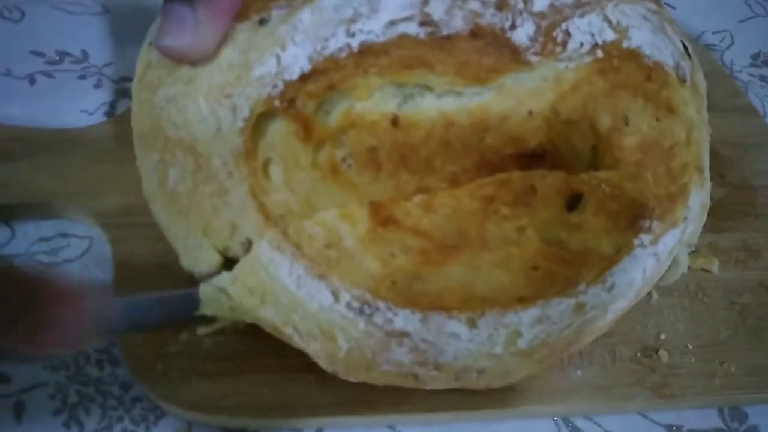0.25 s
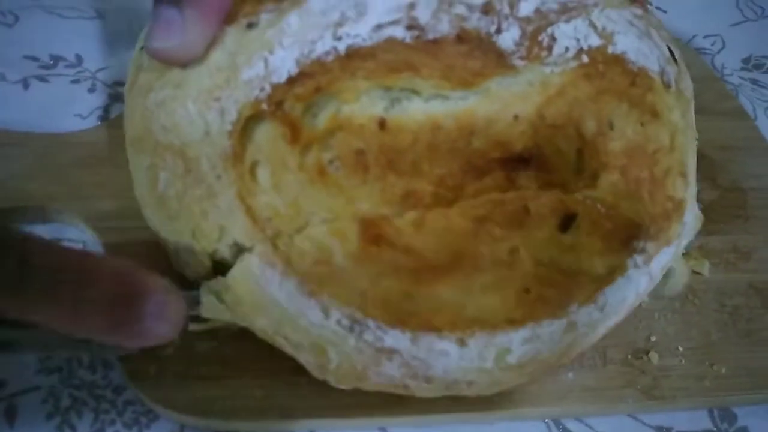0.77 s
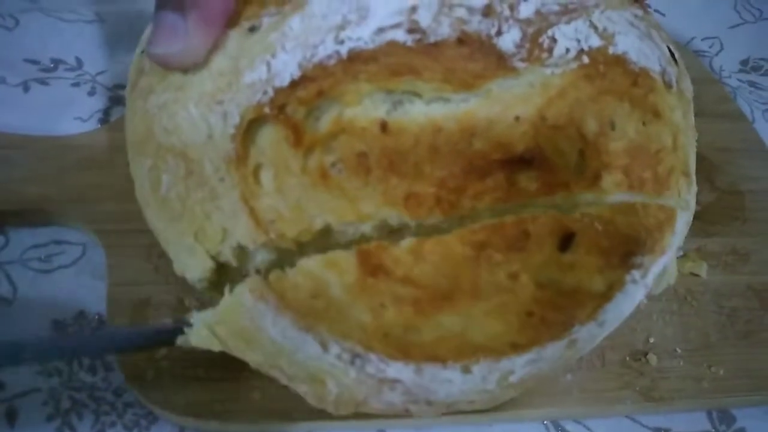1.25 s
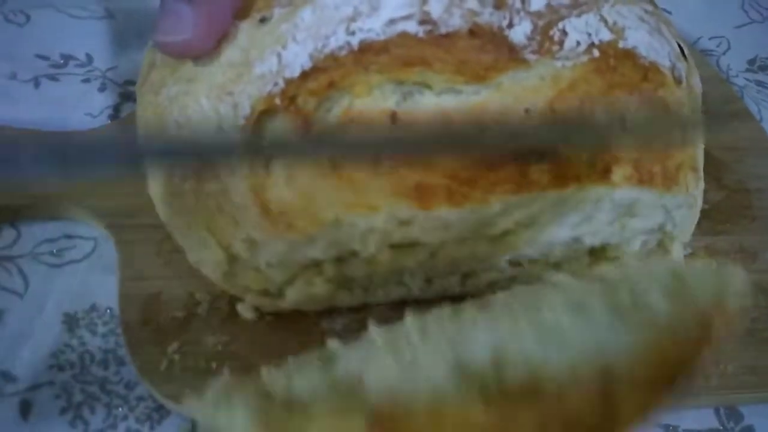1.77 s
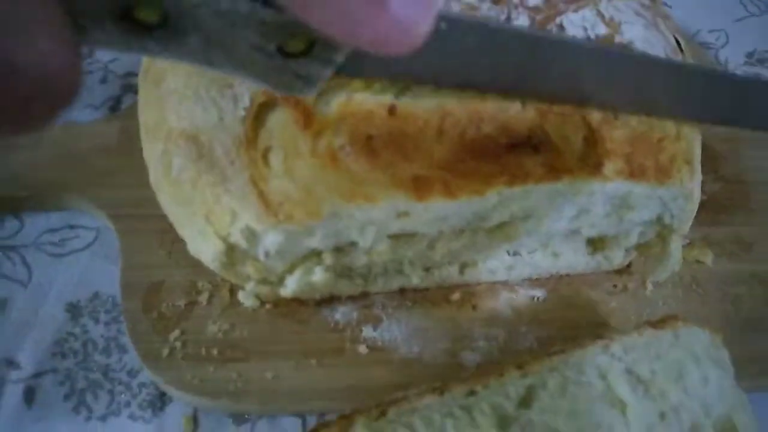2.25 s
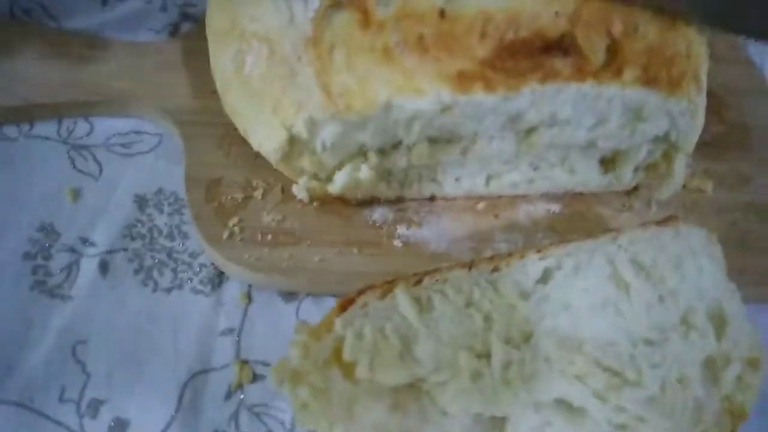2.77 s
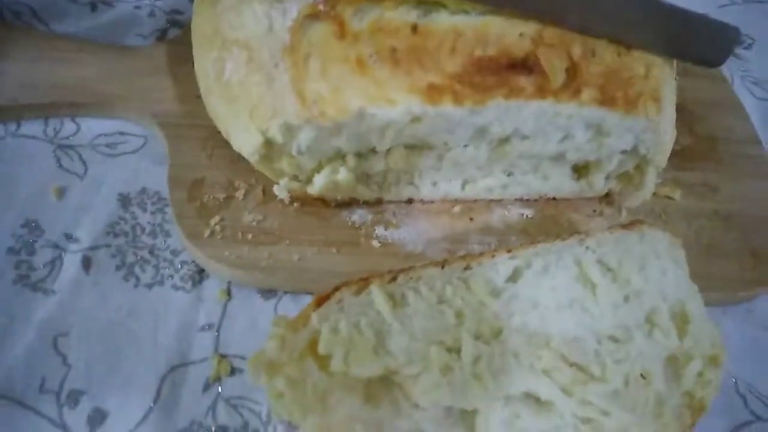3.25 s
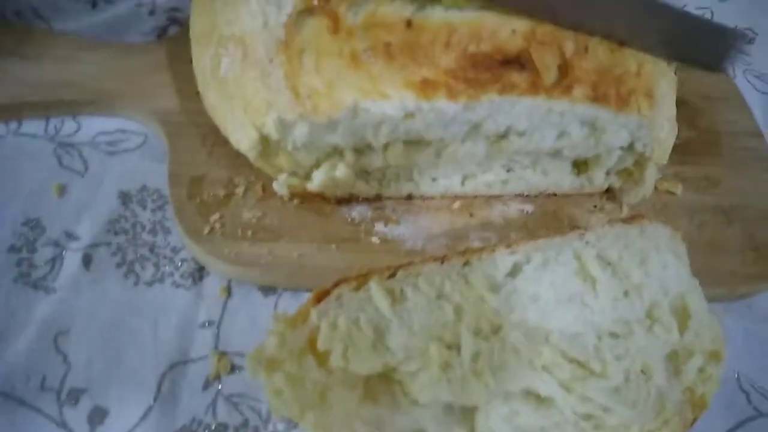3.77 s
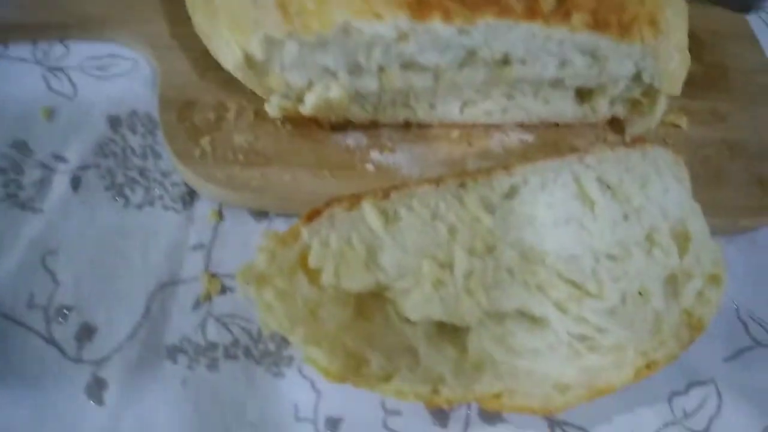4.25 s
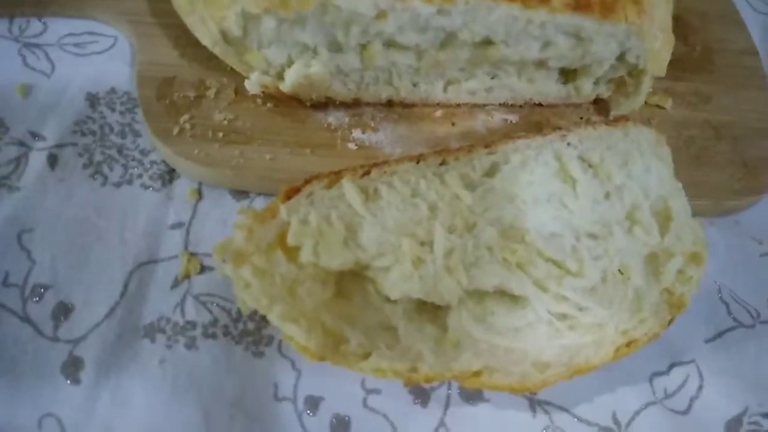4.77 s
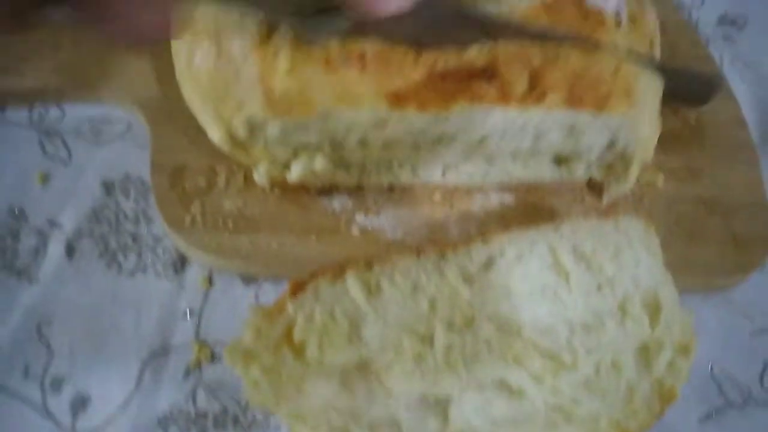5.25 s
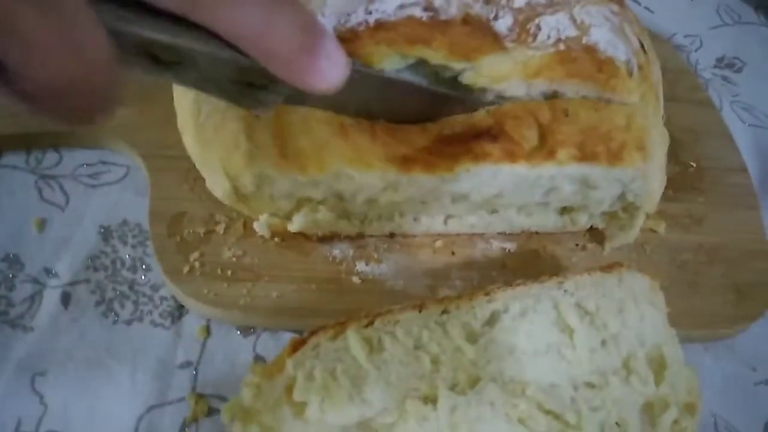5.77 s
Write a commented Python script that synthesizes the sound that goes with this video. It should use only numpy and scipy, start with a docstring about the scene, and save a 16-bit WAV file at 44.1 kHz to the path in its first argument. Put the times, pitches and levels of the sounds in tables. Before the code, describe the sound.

Very close to the microphone in a quiet room, a serrated knife saws a crusty loaf in rapid, rough strokes with loud cracks and a brief steely ring at the start. After a second the blade slides out softly, near silence follows, and the slice knocks on the board and rustles. Crackles lead into a second, longer run of even sawing with low wooden rumbling.

```python
"""A serrated knife saws through a crusty loaf on a wooden board that lies on a cloth-covered table.
Each stroke is a swell of noise: dense cracks for the crust, resonances for the loaf, board and table.
The steel blade sings at the start; after the first cut it slides out, and the slice knocks and slides.
Sawing then resumes. Noise reaches two ports alike in the bass; the hardest peaks clip."""
import sys
import numpy as np
from scipy import signal
from scipy.io import wavfile
from scipy.ndimage import uniform_filter1d

SR = 44100
rng = np.random.default_rng(int(sys.argv[2]) if len(sys.argv) > 2 else 0)


def store_pcm(level_fs):
    """Save levels as 16-bit WAV."""
    pcm = np.round(np.clip(level_fs, -1, 1) * 32767).astype(np.int16)
    wavfile.write(sys.argv[1], SR, np.atleast_2d(pcm).T)


N = 265041

# Loud single breaks of crust and crumb. Each row: start in seconds, relative peak in dB,
# relative crispness (treble weight) in dB, relative level of the thud in dB.
CRACKS = [(0.06, -8, -18, -25), (0.348, -15, -22, -23), (0.3798, 10, -3.5, -27), (0.4977, -4, 0.5, -3),
          (0.532, 8.5, -42, -5), (0.6367, -3, 4, -5), (0.6632, 14, -12, -7), (.785, -20, -29, -2),
          (0.8071, 0, -15, 0), (0.91, -6, 6.5, -24), (0.9552, 12.5, -9, -8), (0.9834, 11.5, 2.5, -11),
          (1.177, -1, -36, -37), (1.4561, -26.5, -22, -43.5), (1.5652, -17, -17, -13.5),
          (2.139, -26, -26, -15.5), (2.183, -30, -14, -32.5), (2.2456, -16, -13, -25),
          (2.284, -24, -20, -19), (2.2994, 3, -18, -36), (2.307, 1, 3, -5), (2.3189, 6.5, -8, -15),
          (2.3417, 7.5, -3, -22), (2.359, 4, -20, -35), (2.371, 10, -19, -32), (2.397, -1, -18.5, -11),
          (2.4242, -4, -5, -28), (2.728, -38, -5, -47), (2.978, 3, -1, -29), (2.984, 1, -1, -25),
          (3.0743, 4, -5, -14), (3.1762, -5, 0, -35), (4.7964, 3, -22, 2.5), (4.828, 4, -24, -22),
          (5.246, 0, -9, -28), (5.3024, -15, -3, -28), (5.114, -7, -23, -12), (.1, -2, -23.5, -24),
          (.24, -15, -23, -20), (.674, 1, -9, -13), (0.819, -6, -12, -16), (0.836, -2, -14, -20.5),
          (3.59, -14, -10, -22), (4.19, -11, -9, -20), (2.4093, -1, 0, -34), (2.4401, 0, -10, -8),
          (2.493, -12, -8, -23.5), (2.817, -12, 0, -18), (2.846, -9.5, 1, -36), (2.9047, -24, 3, -40),
          (2.9538, -4, -4, -32), (2.967, 2.5, 2, -18), (3.0069, 5.5, 2, -31), (3.0669, 7.5, -4, -12),
          (3.097, 2, 4, -10), (3.1218, -24, -13, -5.5), (3.1474, -9, -12, -7.5), (3.2208, -4.5, 4, -31),
          (3.2355, 4, -6, -11), (3.263, 7, -2, -26), (3.28, 7, -10, -24), (3.3006, 9, -18, -26),
          (3.385, -2, -0.5, -36), (3.4162, -17, -7, -29), (3.453, 4, -3, -4), (3.482, -4, 6, -23),
          (3.5523, -1, -11, -20), (3.6827, -2, -6, -14), (3.7556, -3, 7.5, -18), (3.7885, -.5, 9.5, -9),
          (3.833, 1, -6, -26), (3.8487, 5.5, -3, -28), (3.8756, 8.5, -8, -25), (3.9126, 4.5, 0, -26),
          (3.9569, -3, 5, -23), (4.085, -2, 0, -17), (4.147, 4.5, -39, -4), (4.167, 5, -42, -1),
          (4.3196, -10, -19, -10), (4.4264, -14, 3, -19), (4.4446, 4.5, -3, 2), (4.4754, 13.5, -6, 10),
          (4.5204, 0, 6, 5), (4.602, -5, -4, -16), (4.683, -2, -3, -32), (4.764, -2, -5, 0),
          (4.7798, -1, -4, 23.5), (4.811, 9, -33, 1), (4.845, 7, -33, 0), (5.0614, -4.5, 9, -25),
          (5.0807, 11.5, -40, -19), (5.0983, 10.5, -35, 1.5), (5.21, -2.5, -36, -30), (5.23, -10, 7, -31),
          (5.3492, 4, -19, -10), (5.4024, 7.5, -25, -25), (5.4226, 4.5, -36, -17), (5.443, 4, -51, -33),
          (5.533, -1, -28, -26), (5.5516, 10.5, -36, -18), (5.5976, 2.5, 1.5, -7), (5.693, 12.5, -9, -29),
          (5.74, 4.5, -18, -10), (5.8827, -1, -5, -17), (5.911, 2.5, 0.5, -31)]
# Spectrum of breaking crust. Each row: frequency in Hz, relative density in dB per Hz.
CRUST_SPECTRUM = [(500, -17), (750, -9), (1260, -9.5), (1900, -6.5), (2900, -9.5), (3500, -11.5),
                  (6700, -14), (7700, -13.5), (9000, -11), (10300, -26), (12500, -44.5), (14800, -27.5),
                  (16000, -45)]
EDGE_UNTIL_S = 1.0  # until then the blade reaches the board
CRACK_T60_S, BOTTOM_CRACK_T60_S = 0.009, 0.016  # the thick bottom crust tears for longer


def from_db(db):
    """Amplitude gain from a level: 20 dB is a factor of ten."""
    return 10 ** (np.asarray(db) / 20)


def rms_one(x):
    """Normalization to unit mean power."""
    return x / np.sqrt(np.mean(x ** 2) + 1e-20)


def in_time(rows):
    """Linear interpolation of each table column over time."""
    s, *columns = np.transpose(rows)
    time = np.arange(N) / SR
    return [np.interp(time, s, column) for column in columns]


def at_hz(points, hz):
    """Interpolation of a spectrum on a logarithmic frequency axis."""
    point_hz, values = np.transpose(points)
    return np.interp(np.log(hz), np.log(point_hz), values)


def low_pass(x, hz):
    """Third-order low-pass filtering: treble above hz falls away."""
    return signal.sosfilt(signal.butter(3, hz, fs=SR, output="sos"), x)


def drift(rate_hz):
    """Slow random modulation: noise through a double pole, spread 1, computed at every 40th sample."""
    step = 40
    r = np.exp(-2 * np.pi * rate_hz * step / SR)
    noise = rng.standard_normal(N // step + 2002)
    slow = rms_one(signal.lfilter([1], [1, -2 * r, r * r], noise)[2000:])  # settled part
    return np.interp(np.arange(N) / step, np.arange(len(slow)), slow)


def fade(clicks, t60):
    """Exponential decay: each click falls by 60 dB in t60 seconds."""
    return signal.lfilter([1], [1, -from_db(-60 / (t60 * SR))], clicks + 1e-18)


def two_ports(mid, side, hz):
    """Partial coherence of two ports: alike in the bass, nearly unrelated in the treble."""
    # Each row: frequency in Hz, left-right correlation before the level difference.
    likeness = [(60, 0.86), (130, 1), (290, 0.88), (640, 0.64), (1410, 0.2), (3100, 0.12), (6820, 0.081),
                (15000, 0.026)]
    # Each row: frequency in Hz, left minus right level in dB.
    lean = [(60, 4.5), (110, 0), (200, 2.5), (380, 2), (700, 2), (1290, 1.5), (2380, 4), (4400, -0.5),
            (8120, 2.5), (15000, -8)]
    alike = at_hz(likeness, hz)
    half_lean_db = at_hz(lean, hz) / 2
    common, opposed = np.sqrt(1 + alike) * mid, np.sqrt(1 - alike) * side
    left = (common + opposed) * from_db(half_lean_db)
    right = (common - opposed) * from_db(-half_lean_db)
    return np.array([left, right]) / np.sqrt(2)


def bursts(per_s, spread_db, t60, clump_db, smooth):
    """Clumped random arrivals: many small breaks, few large, over a smooth rub; envelope of rms 1."""
    sizes = from_db(spread_db * np.minimum(rng.exponential(1, N), 5))
    born = rng.random(N) < per_s * from_db(clump_db * drift(35)) / SR
    breaks = rms_one(fade(sizes * born, t60))
    return rms_one(breaks + abs(smooth))


def coloured(envelope, spectrum, tilt_db, patchy_db, count):
    """Subband shaping of noise: count bands an octave, treble tilted above 3 kHz, each level drifting."""
    out = 0
    edges = 25 * 2 ** np.arange(0, 9.5, 1 / count)
    white = rng.standard_normal((2, 2, N)) * envelope
    for k, (low, high) in enumerate(zip(edges, edges[1:])):
        hz = np.sqrt(low * high)
        if spectrum[0][0] < hz < spectrum[-1][0]:
            band = signal.butter(2, [low, high], "band", fs=SR, output="sos")
            mid, side = signal.sosfilt(band, white[k % 2])  # neighbouring bands use separate noise
            tilt = np.clip(np.log2(hz / 3000) / 2.09, 0, 1)
            gain = from_db(at_hz(spectrum, hz) + tilt * tilt_db + patchy_db * drift(7.9))
            out = out + gain * two_ports(mid, side, hz)
    return out


def resonate(envelope, modes):
    """Modal resonance: enveloped noise excites parallel two-pole filters."""
    out = 0
    white = rng.standard_normal((2, N)) * envelope
    for k, (hz, width_hz, level_db) in enumerate(modes):
        r = np.exp(-np.pi * width_hz / SR)
        poles = [1, -2 * r * np.cos(2 * np.pi * hz / SR), r * r]
        zeros = np.array([1, 0, -1]) * (1 - r * r) / 2
        mid, side = signal.lfilter(zeros, poles, white)
        out = out + (-1) ** k * from_db(level_db) * two_ports(mid, side, hz)
    return out


def evened(x, window_s, share):
    """Partial envelope flattening: steady pressure gives a steady shudder; rms 1."""
    power = uniform_filter1d(np.mean(x ** 2, axis=0), round(window_s * SR))
    return rms_one(x / np.sqrt(power + 1e-12) ** share)


def sawing():
    """Power addition: bell-shaped strokes over resting contact; the louder part sets the crispness."""
    # Blade and hand resting on the loaf, under and between the strokes. Each row: time in seconds,
    # then relative levels in dB of crust, crispness, loaf, board and table.
    contact = [(0.0, -35.5, -11, -37.5, -37, -33), (.9, -31.5, -20.5, -28, -39.5, -38),
               (1.0, -34, -17, -36, -49, -57), (1.17, -35, -18.5, -40, -40, -40),
               (1.362, -46, -32, -52, -54, -57), (1.372, -67, -16, -51, -42.5, -50.5),
               (1.84, -73, -11, -49.5, -44, -34.5), (1.87, -57, -20, -34, -36, -39),
               (2.0, -56, -27, -41, -35.5, -54.5), (2.02, -76, -12, -40, -33.5, -46),
               (2.23, -69, -14, -44.5, -36, -35.5), (2.26, -48, -18, -28, -35, -50),
               (2.4, -31.5, -12.5, -24.5, -33, -42), (2.69, -46.5, -22.5, -35, -36, -37),
               (2.705, -67, -14, -46, -36, -45.5), (2.93, -76, -3, -45.5, -41.5, -37),
               (2.96, -41.5, -3, -41, -30, -43), (4.6, -41.5, -44, -32.5, -26, -38),
               (5.6, -36, -22, -28.5, -30, -37), (6.01, -37, -5, -41, -41, -38)]
    # Strokes of the knife. Each row: middle in seconds, half length in seconds,
    # then relative levels in dB of crust, crispness, loaf, board and table.
    strokes = [(.066, 0.064, -20.5, -21, -19, -28, -28), (0.22, 0.07, -21.5, -21.5, -21, -26, -36),
               (0.357, 0.052, -23.5, -17, -19.5, -40, -22), (0.532, 0.045, -26, -10, -16.5, -35, -42),
               (0.667, 0.04, -20, -17.5, -19, -30, -31), (0.824, 0.041, -21, -14, -20.5, -34, -26.5),
               (0.964, 0.038, -18.5, -13, -24.5, -36, -36), (2.335, 0.055, -24.5, -20, -22, -23, -32),
               (2.497, 0.011, -32.5, -4, -21, -26, -45), (2.838, 0.033, -48, -3, -36.5, -47, -40),
               (2.987, 0.035, -33, -5, -25, -32, -33), (3.095, 0.08, -34.5, -13, -29, -40, -39),
               (3.286, 0.061, -27.5, -9, -22.5, -21, -25), (3.439, 0.062, -28, -17, -21.5, -21, -27),
               (3.592, 0.067, -27.5, -11, -20, -15.5, -21.5), (3.748, 0.072, -26, -14, -18.5, -20.5, -36),
               (3.893, 0.054, -24.5, -9, -16.5, -21.5, -22), (4.035, 0.074, -31, -5.5, -23, -27, -42),
               (4.194, 0.061, -26, -9.5, -16.5, -21, -27), (4.342, 0.066, -28.5, -13, -21, -32, -26),
               (4.499, 0.065, -23.5, -7.5, -12, -13, -26), (4.646, 0.075, -28, -8, -22.5, -17.5, -29),
               (4.807, 0.085, -28.5, -12.5, -20, -21, -36), (4.954, 0.091, -31, -11, -25, -30.5, -27.5),
               (5.1, 0.054, -23.5, -15, -15.5, -19, -23.5), (5.248, 0.079, -27.5, -15, -25.5, -27, -34),
               (5.423, 0.059, -27, -19.5, -23.5, -18.5, -42), (5.55, 0.066, -26.5, -16, -25, -29, -24.5),
               (5.698, 0.018, -34, -2, -35, -32, -23.5), (5.886, 0.074, -31.5, -14, -24, -28, -25.5),
               (6.0, 0.013, -32, -6, -27.5, -29, -34)]
    fall_db = 12  # fall of the bread from the middle of a stroke to its ends
    squareness = 2.45  # 2 = round bell, more = flatter top and steeper ends
    wood_lag_s, wood_stretch = 0.0075, 1.01  # the wood follows late and for longer

    rest_crust, rest_crisp, *rest = in_time(contact)
    powers = [from_db(2 * db) for db in (rest_crust, *rest)]
    weighted_crisp = rest_crisp * powers[0]
    time = np.arange(N) / SR
    for s, half_s, crust_db, crisp_db, loaf_db, board_db, table_db in strokes:
        near = slice(max(round((s - 0.3) * SR), 0), round((s + 0.3) * SR))
        age = time[near] - s
        bread_db = -fall_db * abs(age / half_s) ** squareness
        wood_db = -fall_db * ((age - wood_lag_s) / (half_s * wood_stretch)) ** 2
        levels = crust_db + bread_db, loaf_db + bread_db, board_db + wood_db, table_db + wood_db
        for power, db in zip(powers, levels):
            power[near] += from_db(2 * db)
        weighted_crisp[near] += crisp_db * from_db(2 * levels[0])
    return weighted_crisp / powers[0], *(10 * np.log10(power) for power in powers)


def crust(crust_db, crisp_db, grain):
    """Brittle fracture: teeth grind in a dense grain, while a light touch glides smoothly."""
    bite = np.clip((crust_db + 47.0) / 31.4, 0, 1)
    envelope = from_db(crust_db + 18.0) * grain ** bite
    return coloured(envelope, CRUST_SPECTRUM, crisp_db + 7.5, patchy_db=2.0, count=3)


def loaf(loaf_db, grain):
    """Damped forced vibration: the crumb shudders with the same grain, softened."""
    # Each row: frequency in Hz, width in Hz, relative level in dB.
    loaf_modes = [(300, 177, -1.5), (418, 125, 5.5), (603, 137, -0.5), (880, 345, -7.5), (1220, 210, -11)]
    shudder = low_pass(resonate(rms_one(fade(grain, 0.0088)), loaf_modes), hz=1730.0)
    return from_db(loaf_db - 3.0) * evened(shudder, window_s=0.031, share=0.48)


def rocking(level_db, modes, top_hz):
    """Low-frequency forced vibration: the push of the hand rocks the wood under the loaf."""
    return from_db(level_db) * evened(low_pass(resonate(1, modes), top_hz), window_s=0.058, share=0.97)


def board_and_table(board_db, table_db):
    """Modal response of the support: board and table rock in their own low bands."""
    # Each row of both: frequency in Hz, width in Hz, relative level in dB.
    board_modes = [(132.5, 18, 2), (174, 57, -5.5), (117.7, 14.5, -3), (228.6, 88, -10)]
    table_modes = [(46.2, 14, -10), (84, 32, 1.5)]
    return rocking(board_db, board_modes, top_hz=350.0) + rocking(table_db, table_modes, top_hz=141.8)


def board_edge(loaf_db):
    """Coupled vibration: while the blade reaches the board, its edge drums with the loaf."""
    # Each row: frequency in Hz, width in Hz, relative level in dB.
    edge_modes = [(240, 110, -4), (191, 38, -6)]
    on = np.arange(N) < EDGE_UNTIL_S * SR
    return on * rocking(loaf_db - 9.5, edge_modes, top_hz=450.0)


def blade():
    """Friction-driven resonance: rubbing on the board edge rings the steel blade."""
    # Each row: time in seconds, relative level in dB.
    rub = [(0.0, -46), (0.054, -21.5), (0.116, -16), (0.326, -30.5), (0.35, -31.5), (0.398, -27.5),
           (0.42, -45.5)]
    # Each row: frequency in Hz, width in Hz, relative level in dB.
    steel_modes = [(1602, 68, -11.5), (2183, 80, 3), (2060, 100, -3.5), (2840, 140, -6.5), (4240, 110, -2),
                   (4320, 120, -11), (4540, 120, -5.5), (8500, 1500, -22), (4700, 100, -33)]
    level_db, = in_time(rub)
    on = np.arange(N) < rub[-1][0] * SR
    ring = evened(resonate(1, steel_modes), window_s=0.012, share=0.4)
    return from_db(level_db + 1.5) * on * ring


def hush():
    """Stationary background noise: the hush of room and microphone."""
    # Each row: frequency in Hz, relative density in dB per Hz.
    hush_spectrum = [(15, -31), (25, 2.5), (78, -14.5), (120, -8.5), (149, -23), (161, -17), (180, 0.5),
                     (217, -11.5), (335, -12), (1790, -62), (16000, -84)]
    return from_db(-37.5) * rms_one(coloured(1, hush_spectrum, 0, patchy_db=2.0, count=2))


def cracks(crust_db, crisp_db):
    """Transient fracture noise: small random breaks with the strokes, and the loud cracks as sprays."""
    small = bursts(per_s=110.0, spread_db=4.5, t60=0.006, clump_db=5.0, smooth=0)
    envelope = from_db(crust_db + 1.0) * small
    crisp = crisp_db + 13.5
    age = np.arange(SR // 40) / SR
    for s, peak_db, crack_crisp_db, _ in CRACKS:
        at = round(s * SR)
        t60 = BOTTOM_CRACK_T60_S if s < EDGE_UNTIL_S else CRACK_T60_S
        swell = (1 - np.exp(-age / (0.15 * t60))) ** 2  # a tear swells before it dies
        envelope[at:at + len(age)] += from_db(peak_db + 3.5 - 60 * age / t60) * swell
        crisp[at:at + SR // 80] = crack_crisp_db + 7.5
    return from_db(4.5) * coloured(envelope, CRUST_SPECTRUM, crisp, patchy_db=4.5, count=3)


def snaps(crust_db):
    """Impulsive release: a click at the core of a break reaches the ports up to 7 samples apart."""
    snap_db, bottom_snap_db = -1.2, -7  # click before filtering, against the crack's listed peak
    sizes = from_db(3.6 * np.minimum(rng.exponential(1, N), 4)) * rng.choice([-1, 1], N)
    born = rng.random(N) < 250.0 * from_db(5.0 * drift(35)) / SR
    clicks = from_db(crust_db + 10.5) * sizes * born
    for (s, peak_db, _, _), sign in zip(CRACKS, rng.choice([-1, 1], len(CRACKS))):
        core_db = bottom_snap_db if s < EDGE_UNTIL_S else snap_db
        clicks[round((s + 0.12 * CRACK_T60_S) * SR)] += sign * from_db(peak_db + core_db)

    at = np.flatnonzero(clicks)
    pair = np.zeros((2, N + 8))
    lag = rng.integers(0, 8, (2, N))
    for port in range(2):
        np.add.at(pair[port], at + lag[port, at], clicks[at])
    band = signal.butter(1, [700.0, 6000.0], "band", fs=SR, output="sos")
    sharp = low_pass(signal.sosfilt(band, pair[:, :N] + 1e-18), hz=10320.0)
    return sharp * from_db([[1.0], [-1.0]])


def thuds():
    """Impulse response of the hollow loaf: each loud crack is a jolt that rings a cycle or two."""
    out = np.zeros(N)
    age = np.arange(SR // 50) / SR
    chance = rng.random((len(CRACKS), 2))
    for (s, _, _, thud_db), (pitch, sign) in zip(CRACKS, chance):
        tone = np.sin(2 * np.pi * (414.0 + 450.0 * pitch) * age)
        jolt = tone * from_db(-60 * age / 0.0041) * np.sign(sign - 0.5)
        out[round((s + 0.0012) * SR):][:len(age)] += from_db(thud_db - 1.0) * jolt
    return out * from_db([[0.8], [-0.8]])


def draw_out():
    """Cavity resonance: the flat of the blade brushes the walls of the open cut as it slides out."""
    # Each row: time in seconds, relative level in dB.
    brush = [(.99, -60), (1.02, -37), (1.17, -36), (1.3, -48.5), (1.362, -50)]
    # Hollow colours of the cut. Each row: frequency in Hz, width in Hz, relative level in dB.
    slit_modes = [(1284, 43, 0), (1916, 40, -4.5), (3100, 74, -5), (3670, 44, -4.5), (6120, 82, -12)]
    level_db, = in_time(brush)
    sample = np.arange(N)
    on = (sample > brush[0][0] * SR) & (sample < brush[-1][0] * SR)
    return from_db(level_db) * on * rms_one(resonate(1, slit_modes))


def knocks():
    """Damped impact of slice on board: a short low tone, rounded start, pressure falling first."""
    # Each row: start in seconds, relative peak in dB, pitch in Hz, 60 dB decay time in seconds.
    blows = [(1.561, -16, 433, 0.012), (1.8933, 5, 408, 0.006), (2.138, -21, 439, 0.015)]
    out = np.zeros(N)
    age = np.arange(round(0.04 * SR)) / SR
    for s, peak_db, hz, t60 in blows:
        rise = 1 - np.exp(-age / 0.0011)
        shape = -np.sin(2 * np.pi * hz * age) * rise * from_db(-60 * age / t60)
        out[round(s * SR):][:len(age)] += from_db(peak_db) * shape / abs(shape).max()
    return out * from_db([[1.2], [-1.2]])


def slide():
    """Sliding friction: the fallen slice drags over board and cloth in a dull, uneven rustle."""
    # Each row: frequency in Hz, relative density in dB per Hz.
    rustle_spectrum = [(88, -37.5), (150, -9.5), (226, -5.5), (271, -8), (340, -3.5), (525, -11.5),
                       (1170, -23), (3500, -91), (4550, -114), (7700, -120)]
    from_s, to_s, edge_s = 1.895, 2.36, 0.015
    level_db, sag_db = -25.5, 8.5  # level once it moves, and its loss as it slows
    corners = [from_s, from_s + edge_s, to_s - edge_s, to_s]
    gain = np.interp(np.arange(N) / SR, corners, [0, from_db(level_db), from_db(level_db - sag_db), 0])
    rustle = coloured(1, rustle_spectrum, 0, patchy_db=-0.5, count=2)
    return gain * rms_one(low_pass(rustle, hz=2000.0))


def scene():
    """Superposition: knife, loaf and board close to the microphone, over the hush."""
    crisp_db, crust_db, loaf_db, board_db, table_db = sawing()
    grain = bursts(per_s=1100.0, spread_db=4.5, t60=0.0063, clump_db=7.5, smooth=1.0)
    bread = crust(crust_db, crisp_db, grain)
    bread = bread + cracks(crust_db, crisp_db) + snaps(crust_db) + thuds()
    bread = bread + loaf(loaf_db, grain)
    wood = board_and_table(board_db, table_db) + board_edge(loaf_db)
    return hush() + bread + wood + blade() + draw_out() + slide() + knocks()


def record(dry):
    """Saturation and band limiting: the hardest peaks clip, then the top is cut."""
    # 70 dB down from 16.2 kHz upward
    top_cut = signal.cheby2(12, 70, 16200, fs=SR, output="sos")
    return signal.sosfilt(top_cut, np.clip(dry, -0.98, 0.98))


dry = scene()
out = record(dry)
store_pcm(out)
```